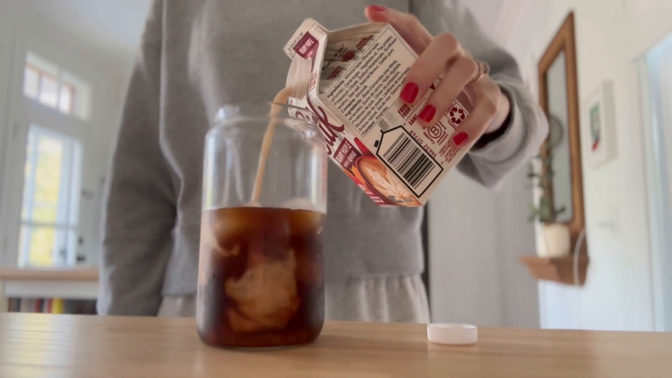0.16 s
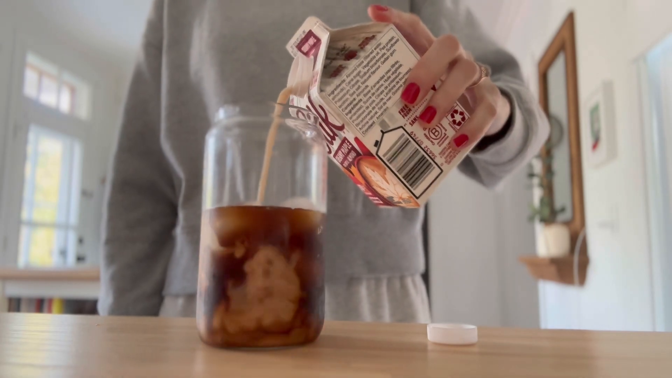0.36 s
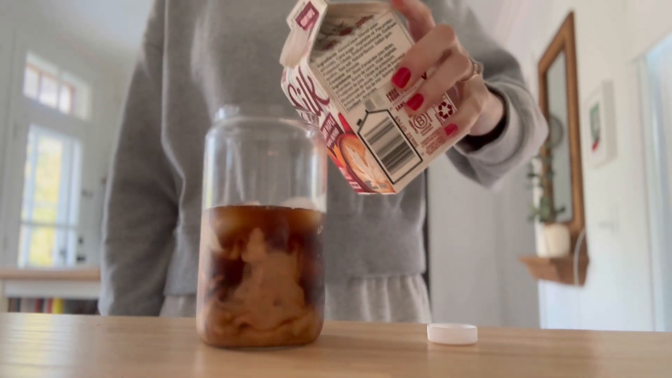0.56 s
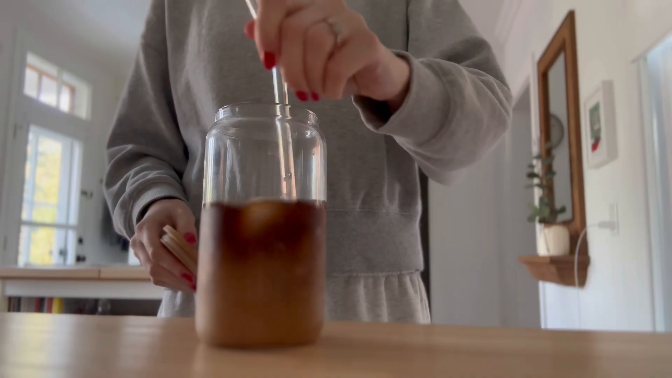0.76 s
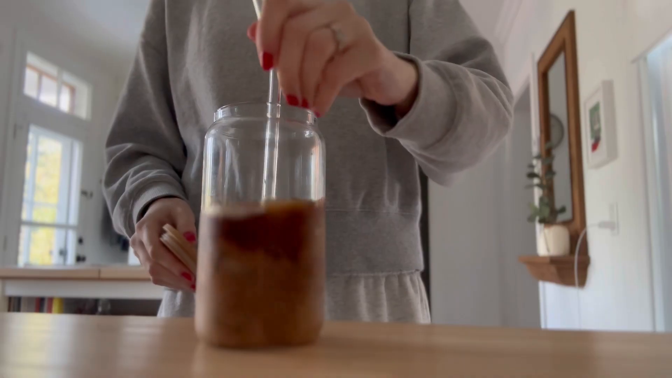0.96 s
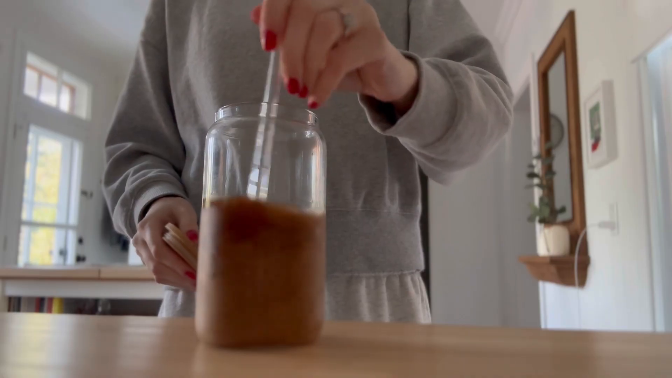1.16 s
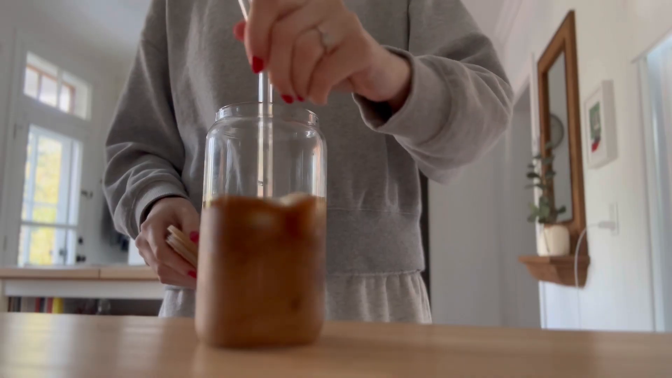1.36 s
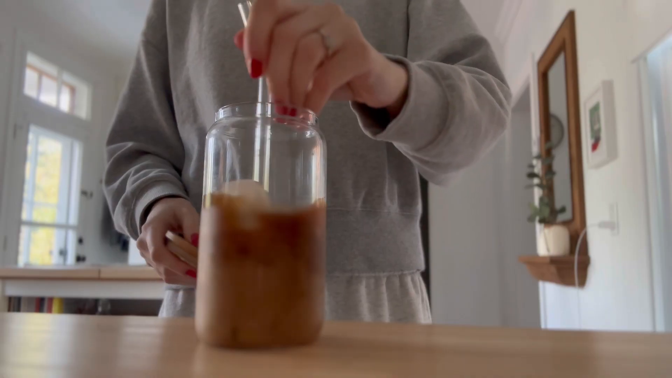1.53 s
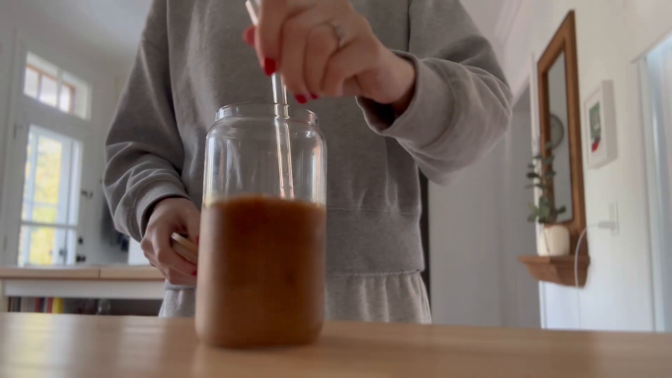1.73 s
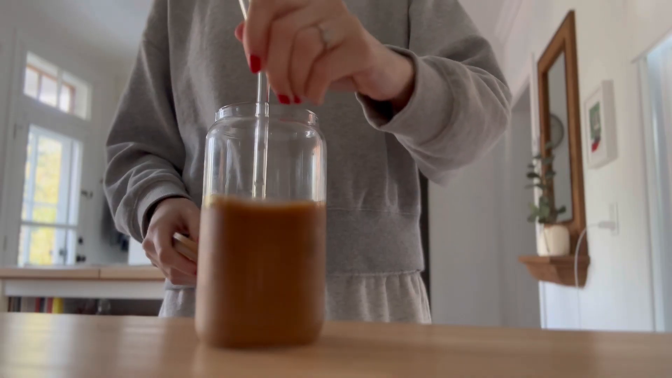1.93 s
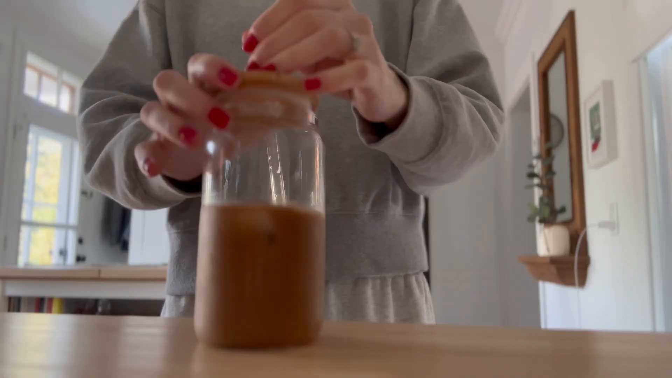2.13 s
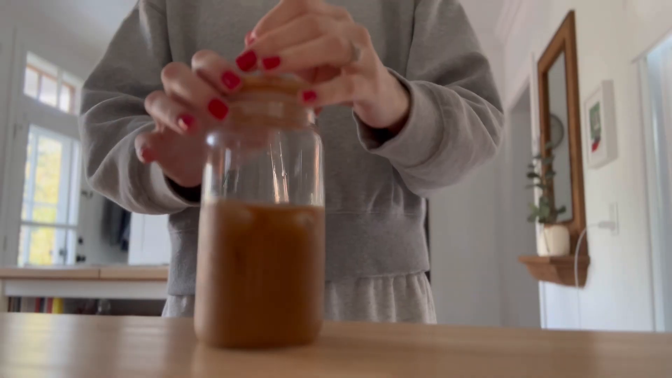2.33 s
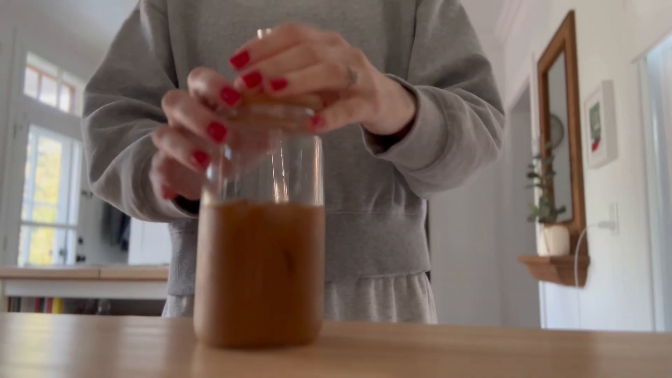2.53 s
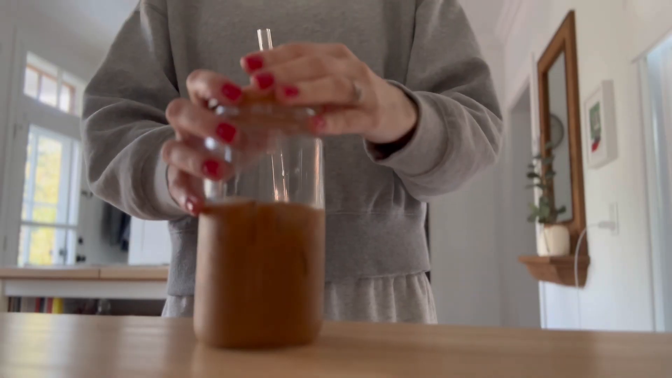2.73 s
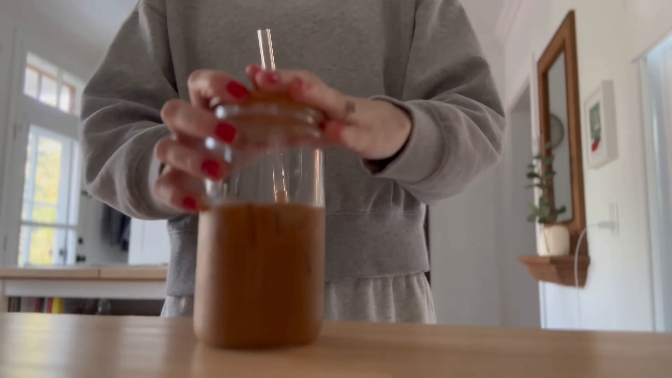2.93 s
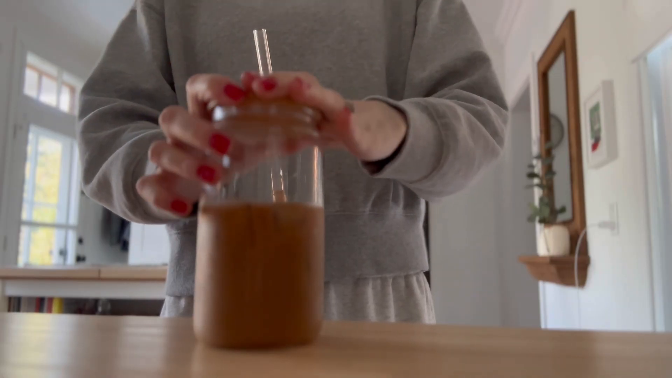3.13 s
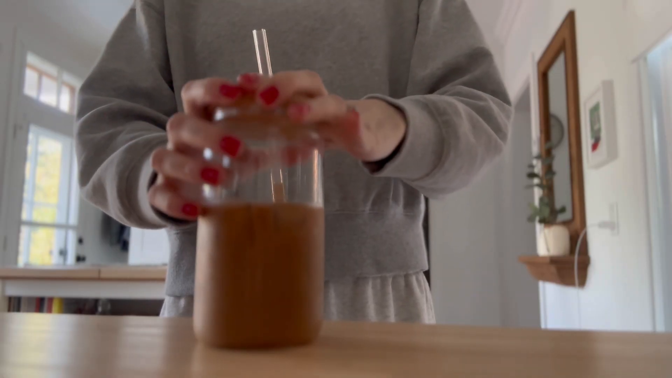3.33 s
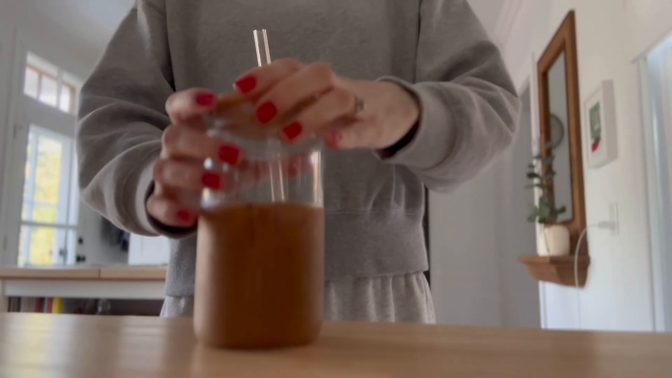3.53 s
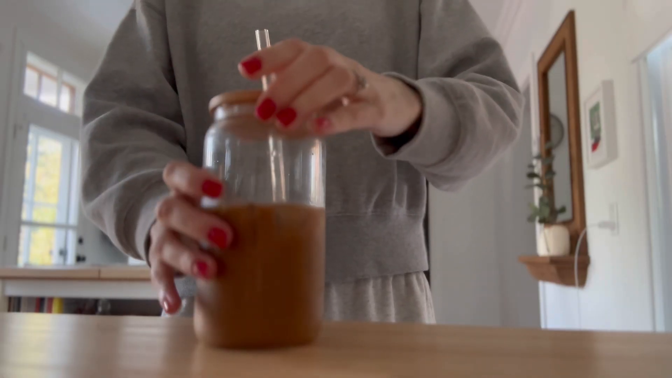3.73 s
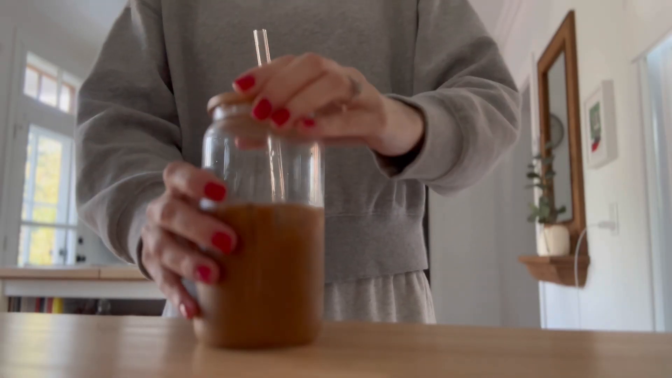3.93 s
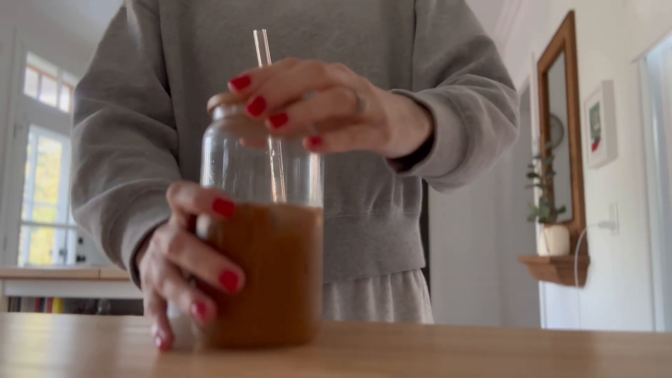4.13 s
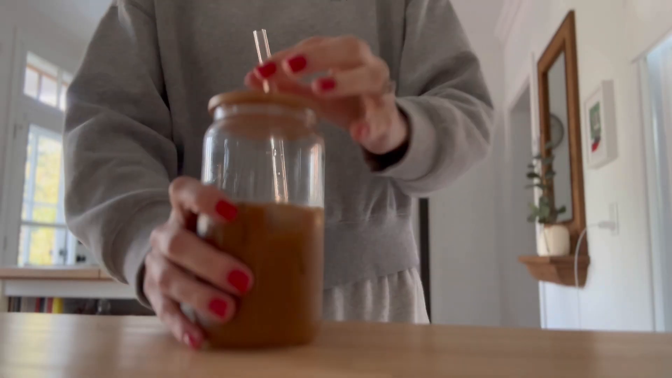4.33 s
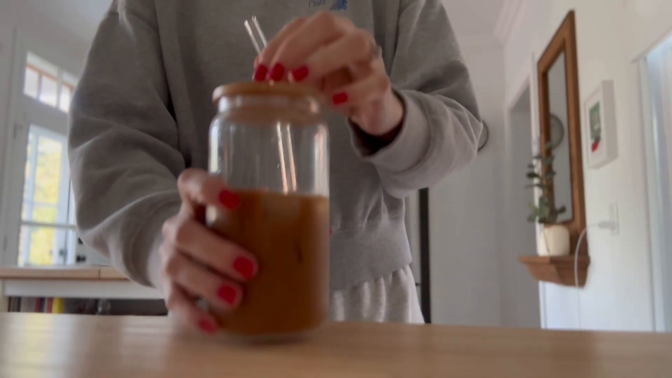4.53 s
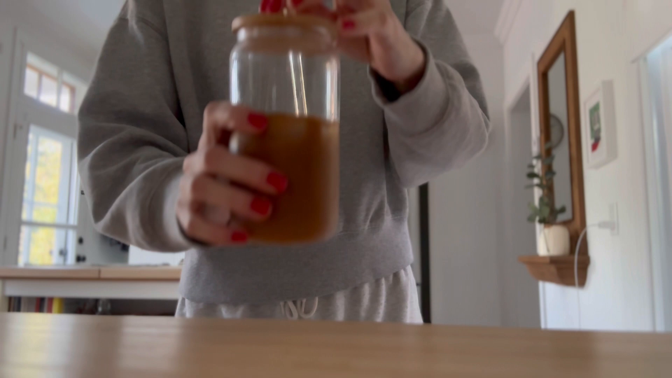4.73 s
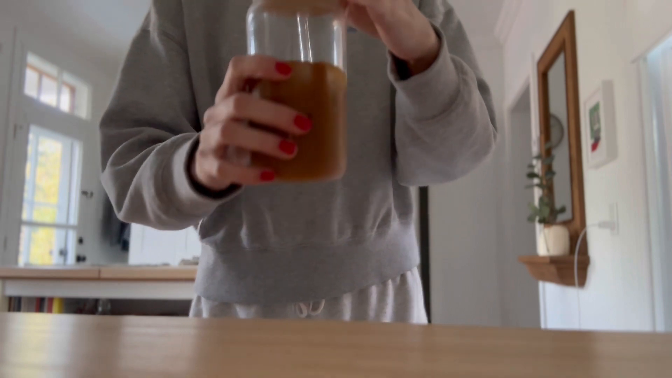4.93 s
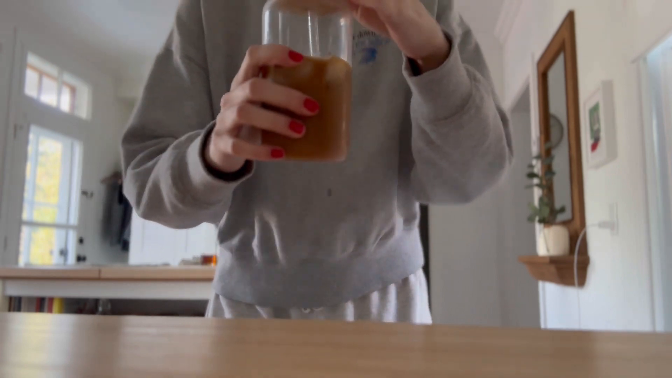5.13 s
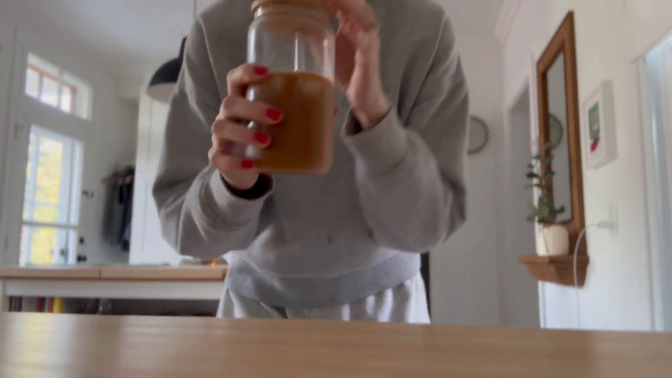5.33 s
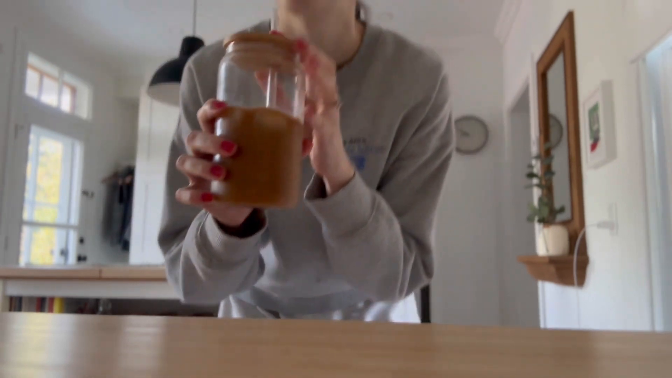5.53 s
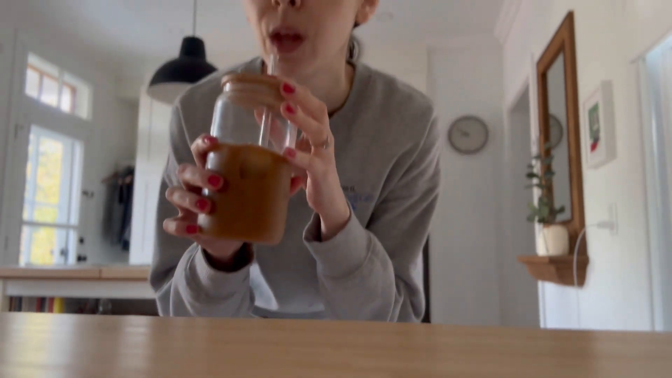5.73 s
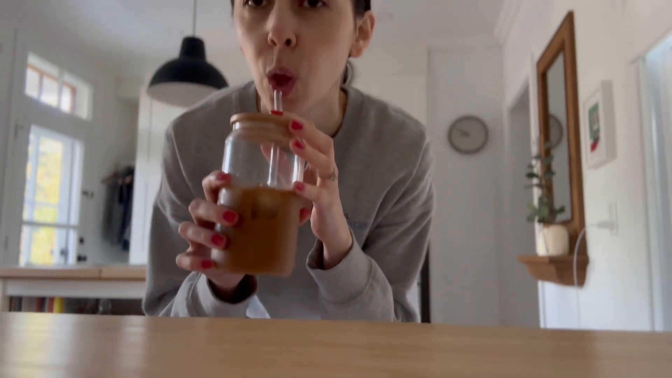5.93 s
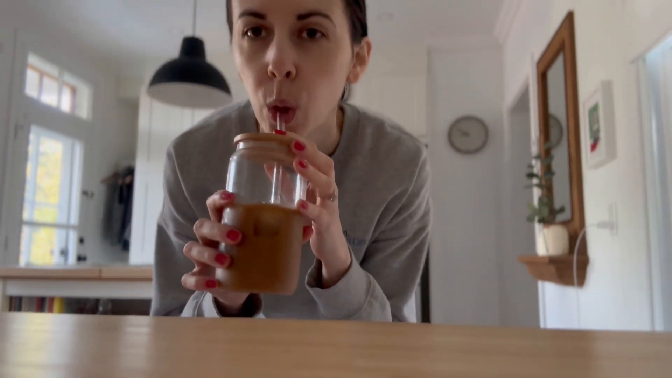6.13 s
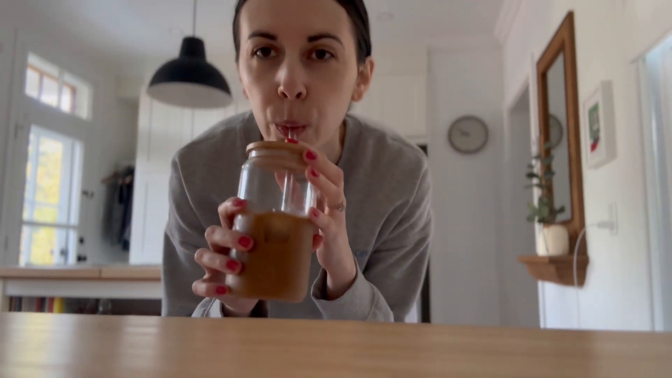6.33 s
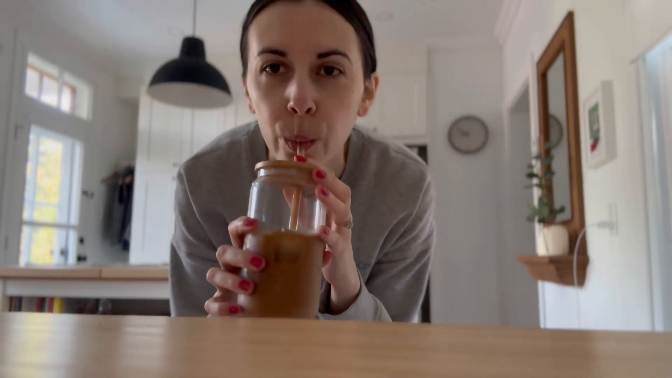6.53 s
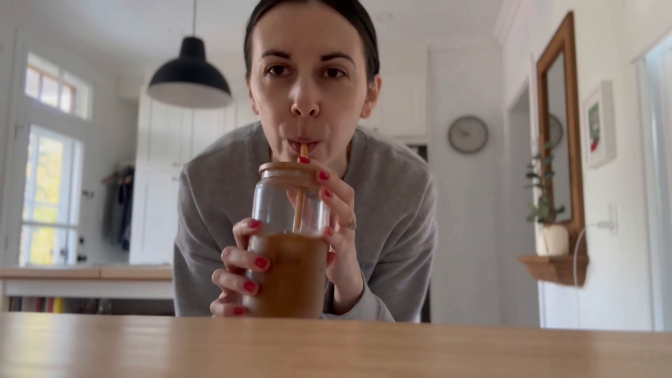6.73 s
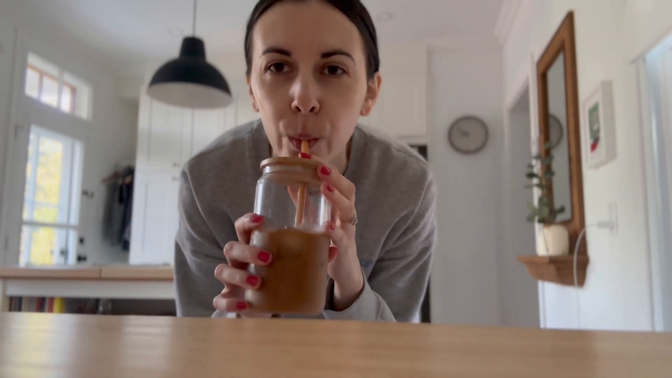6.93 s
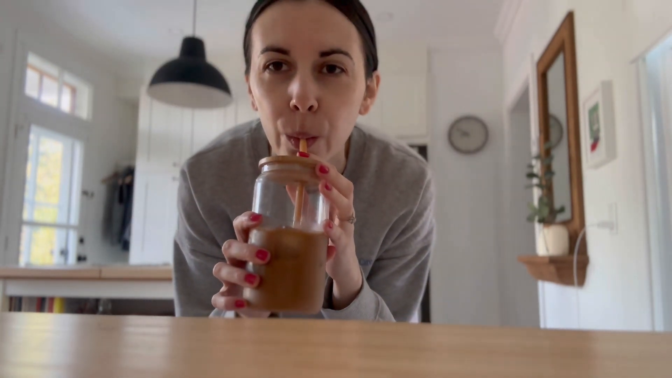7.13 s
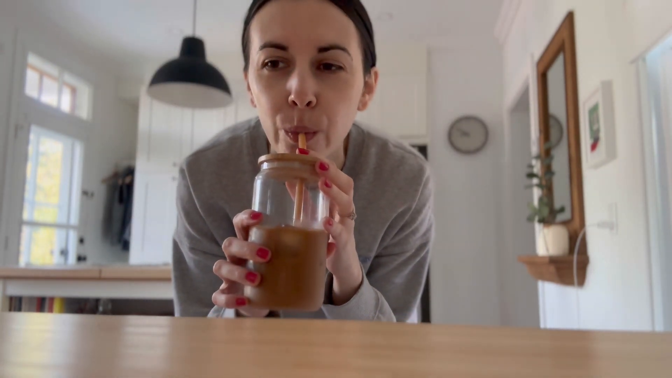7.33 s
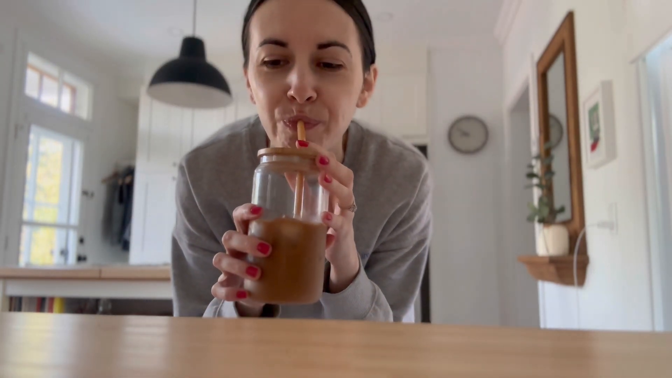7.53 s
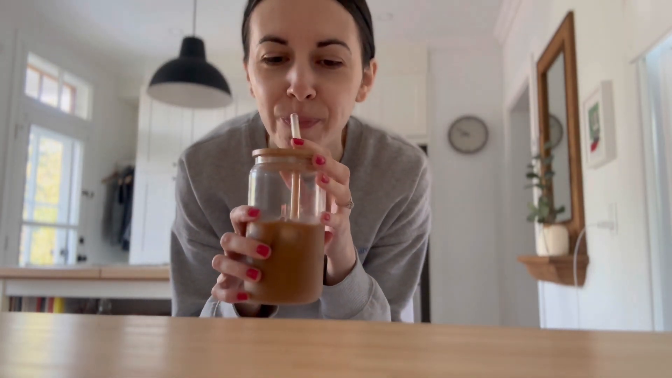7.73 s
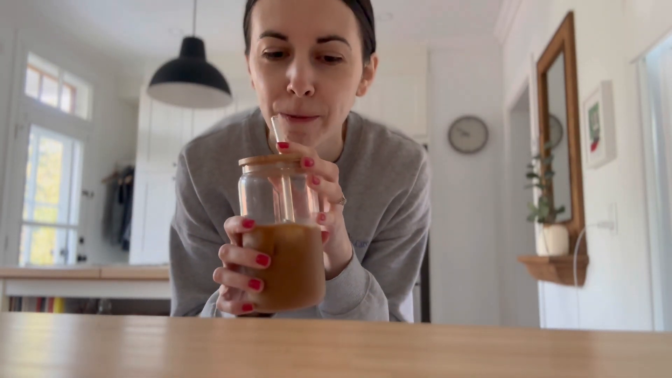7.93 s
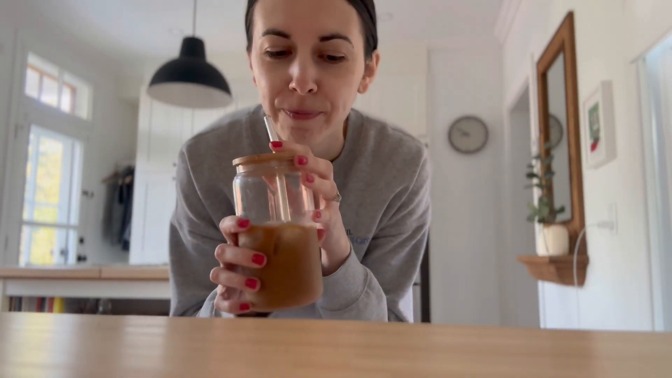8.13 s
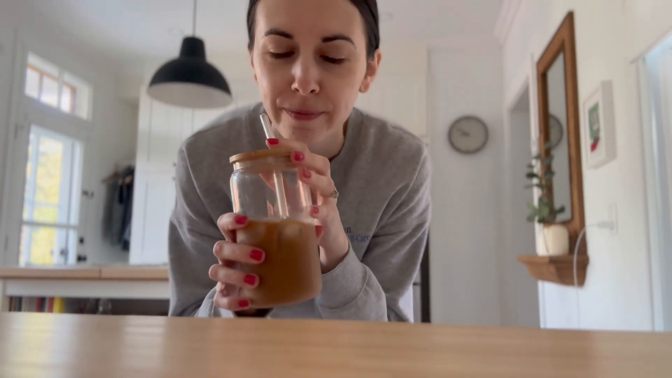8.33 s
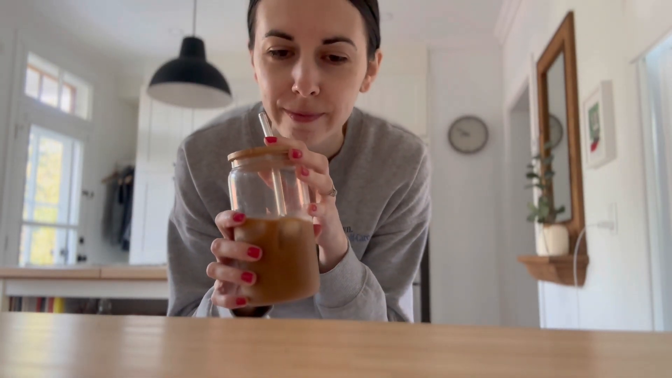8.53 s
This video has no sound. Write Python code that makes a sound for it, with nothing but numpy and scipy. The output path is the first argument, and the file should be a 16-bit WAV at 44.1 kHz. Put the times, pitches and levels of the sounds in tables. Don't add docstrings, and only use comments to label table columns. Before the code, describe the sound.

A quiet kitchen heard from close stereo microphones on a wooden counter, with faint hiss and a low, wavering rumble of a tumbling machine in a far room. From 0 to 0.7 s there is little besides that bed, light cloth rustle and a soft bump near 0.55. At 0.75 s stirring starts abruptly: ice cubes clatter densely against a glass jar, with bright straw clicks, hollow cube knocks, short ringing glass tones and gritty grinding, and a sharp rim tap at 1.6. It thins after 1.9, with a strong clink at 2.15. A lid knocks on around 2.3 to 2.4 s; low soft thuds follow at 2.6, 3.05 and 3.8. From 4 s the jar is lifted: sleeves rustle, strongest from 5.1 to 5.9, with small damped ice clinks and a clearer one at 5.17. After 6 s it is nearly still, with sparse faint ticks, one small clink at 7.4 and light handling until 8.5.

```python
import sys
import numpy as np
from scipy import signal
from scipy.io import wavfile
from scipy.ndimage import uniform_filter1d

SR = 44100
rng = np.random.default_rng(int(sys.argv[2]) if len(sys.argv) > 2 else 0)


def to_linear_factor(level_db):
    exponent = np.asarray(level_db, float) / 20
    return 10 ** exponent


def pcm_store(signal):
    levels = np.round(np.clip(np.atleast_2d(signal), -1, 1) * 32767)
    wavfile.write(sys.argv[1], SR, levels.astype(np.int16).T)


N = 377937

# time in
# seconds, level in dB.
LOAD = [(0.0, -51), (0.55, -56), (0.79, -56), (1.1, -51), (1.26, -45.5), (1.43, -46), (1.77, -47.5),
        (2.43, -48), (2.6, -52.5), (3.55, -53), (4.68, -55.5), (5.37, -56.5), (5.92, -59), (6.2, -54.5),
        (7.83, -58), (7.97, -56), (8.4, -59), (8.57, -50.5)]
# frequency in Hz, level in dB per Hz.
TUMBLE_SPECTRUM = [(35, -36), (60, -2.5), (150, -3.5), (357, -5), (441, -12), (487, -7.5), (650, -19),
                   (840, -50), (1430, -120)]
# frequency in Hz, level in dB per Hz.
HOLLOW_SPECTRUM = [(350, -36), (600, -1.5), (895, 11.5), (1650, -25), (1900, -17), (2470, -44),
                   (4180, -120)]
# frequency in Hz, level in dB rms.
MOTOR = [(37, -61), (74, -65), (147.5, -59.5)]
# frequency in Hz, level in dB per Hz.
HISS_SPECTRUM = [(590, -27), (1000, -6.5), (1320, -11), (1620, -17), (3500, -21), (7000, -29), (9000, -23),
                 (13800, -36)]
# frequency in Hz, left-right likeness from -1 to 1.
LIKENESS = [(60, 0.94), (180, 0.7), (550, -0.27), (1650, 0.36), (4970, -0.39), (15000, 0.18)]
# frequency in Hz, echo level in dB, t60 in seconds.
KITCHEN = [(700, -13.5, 0.29), (2850, -24.5, 0.51), (10200, -14, 0.37)]
# frequency in Hz, level in dB per Hz.
RUSTLE_SPECTRUM = [(710, -41), (1200, -7.5), (2410, -9), (9990, -28), (13200, -37.5), (15500, -51)]
# start in seconds, rise in seconds, fall of 20 dB in seconds (held within
# 0.05 to 0.45), level in dB.
SLEEVE_MOVES = [(0, 0.0043, -0.24, -74), (0.129, 0.008, 0.46, -75.5), (.562, 0.017, 0.12, -66.5),
                (2.6, 0.019, 1.5, -75.5), (2.76, 0.046, .45, -78), (3.05, 0.072, 0.2, -80),
                (3.33, 0.084, 0.5, -80), (3.999, 0.038, 1.4, -75), (4.437, 0.021, 40.5, -75.5),
                (4.581, 0.13, -0.3, -69.5), (4.82, 0.12, 3, -75), (5.16, 0.15, 0.69, -68),
                (5.3, 0.064, 3.2, -69), (5.559, 0.02, 0.4, -67), (5.853, 0.074, 0.1, -65.5),
                (5.93, 0.075, -0.06, -73.5), (6.19, 0.05, 1.7, -74), (6.5, 0.04, -11, -75),
                (7.0, 0.21, -6, -80), (7.788, 0.057, 0.8, -75), (7.9, 0.13, -6.5, -80.5),
                (8.3, 0.058, -12.5, -87.5), (8.399, 0.026, 1, -71.5)]
# start in seconds, peak in dB, pitch in Hz, t60 in seconds.
THUDS = [(0.281, -34.5, 238, 0.048), (0.565, -33, 135, 0.0087), (0.911, -22, 402, 0.023),
         (0.982, -20, 278, 0.017), (1.039, -28, 690, 0.021), (1.317, -34, 418, 0.072),
         (1.61, -33, 395, 0.14), (2.139, -39, 197.3, 0.3), (2.291, -22.5, 513, 0.04),
         (2.465, -48, 610, 0.11), (2.607, -34.5, 407, 0.039), (3.038, -28, 282.6, 0.037),
         (3.07, -29, 124, 0.052), (3.778, -25.5, 292, 0.041), (3.81, -33, 120, 0.048),
         (2.368, -30, 116, 0.12), (2.383, -27.5, 620, 0.035), (2.408, -13, 574, 0.053),
         (2.579, -30, 84.5, 0.048), (3.044, -17, 105.6, 0.035), (3.786, -17, 110, 0.04),
         (4.258, -33, 82.2, 0.14), (4.373, -30.5, 86.7, 0.23), (6.153, -41, 222.5, 0.044),
         (7.156, -44.5, 485, 0.17), (7.855, -45.5, 832, 0.099), (7.795, -49, 832, 0.044),
         (3.387, -36, 110.6, 0.1), (3.599, -35, 119, 0.11), (4.05, -42, 475, 0.069),
         (8.326, -50.5, 750, 0.031), (8.365, -45, 804, 0.033), (8.432, -44, 425, 0.02)]
# start in seconds, peak in dB, tilt in dB per octave.
RIM_TAPS = [
    (1.2005, -24, 11),
    (1.614, -11.5, 4),
    (2.2647, -52, -5),
    (2.288, -22, 0),
    (2.4988, -34.5, 1),
    (5.1659, -36, 13),
    (5.4736, -49.5, -4.5),
]
# frequency in Hz, level in dB, t60 in seconds.
STRAW_MODES = [(6760, -8.5, 0.083), (7510, -3.5, 0.12), (7740, -2, 0.13), (8270, -4.5, 0.051),
               (9350, -15.5, .15), (9600, -4.5, 0.053), (11190, -16, 0.06), (12430, -4, 0.067),
               (13400, -15, .15)]
# start in
# seconds, level in dB, top octave over it in dB.
TICKS = [(0.7574, -23.5, -5.5), (0.8344, -26.5, -13.5), (0.8542, -31, -11.5), (0.866, -33.5, -8),
         (0.899, -33, -5.5), (0.91, -23, -5), (0.942, -29, -6.5), (0.978, -21, -6.5), (1.01, -24.5, -6),
         (1.0372, -21, -10), (1.0635, -31.5, -6.5), (1.07, -32, -11), (1.1343, -35.5, -8.5),
         (1.2016, -21, -7), (1.222, -17, -10), (1.2723, -23.5, -11), (1.296, -27, -6), (1.304, -19, -11.5),
         (1.328, -26.5, -5.5), (1.38, -25, -5), (1.4194, -35, -11.5), (1.4665, -39, -9.5),
         (1.488, -34.5, -10), (1.508, -36.5, -12.5), (1.541, -29.5, -12), (1.5472, -20, -8),
         (1.572, -30, -15.5), (1.588, -26.5, -8), (1.615, -12.5, -1), (1.699, -19, -12.5),
         (1.744, -32.5, -15), (1.764, -27, -10), (1.8033, -36, -12), (1.809, -35.5, -11.5),
         (1.8318, -31.5, -10.5), (1.846, -35.5, 0.5), (1.8648, -37, -5.5), (1.876, -33.5, -15),
         (1.9, -37.5, -4.5), (1.9081, -32.5, -6), (1.932, -23, -6), (2.043, -40.5, -17),
         (2.076, -49, -10.5), (2.114, -36, -13.5), (2.1431, -34, -16.5), (2.2652, -48, -10),
         (2.2744, -46, -13), (2.2884, -17.5, -8), (2.5017, -38.5, -5.5), (2.562, -45.5, -8),
         (2.606, -36.5, -18), (2.6904, -62, -14),
         (3.034, -54, -3), (4.833, -52, -23), (4.909, -45, -12), (4.918, -43, -10), (5.1467, -58, -14),
              (5.1673, -31.5, -8), (5.474, -54, -6)]
# low edge in Hz, high edge in Hz, level in dB, fade in seconds.
TICK_CRACK = [
    (4018, 9240, -1.5, 0.0034),
    (9600, 15800, -6, 0.0035),
]
# time in seconds, level in dB.
GRIND = [(0.755, -44), (0.79, -36.5), (0.86, -33), (0.96, -38), (1.304, -39.5), (1.69, -40), (1.802, -42.5),
         (2.3, -65.5)]
# frequency in Hz, level in dB, t60 in seconds.
STANDING_MODES = [
    [(2411, -9.5, 0.013), (2934, -7, 0.02), (2864, -4.5, 0.1), (3440, -10.5, 0.17), (4480, -12.5, 0.076)],
    [(391, -16, 0.093), (1020, -9.5, 0.045), (1147, -2.5, 0.085)],
    [(1654, 1.5, 0.26), (1630, -10.5, 0.08)],
]
# frequency in Hz, level in dB, t60 in seconds.
LIFTED_MODES = [
    [(2484, -12, 0.27), (2960, 4, 0.022), (3506, 0.5, 0.047), (4630, -8.5, 0.074), (5090, -4, 0.023)],
    [(1120, 2, 0.031)],
    [(1656, -5.5, 0.092), (1706, 2, 0.045), (1850, -6, 0.021)],
]
# low edge in Hz, high edge in Hz, level in dB, fade in seconds.
CUBE_CRACK = [
    (1750, 5400, -10.5, 0.0055),
    (485, 1810, -10.5, 0.0029),
    (1290, 3830, -10.5, 0.0036),
    (5800, 10800, -3.5, 0.0024),
]
# start in seconds, wall tone in dB, overtones in dB, ring length factor.
SQUARE_HITS = [(0.7551, -22, -36, 0.63), (0.837, -23, -26.5, 0.64), (0.866, -21, -50, 1),
               (0.9008, -26.5, -30, 0.56), (.926, -22, -50.5, .6), (0.976, -23.5, -50.5, .6),
               (1.02, -23.5, -51, .6), (0.9444, -9.5, -24.5, 0.18), (1.01, -24.5, -26.5, 0.59),
               (1.0364, -12.5, -27.5, 0.81), (1.063, -14, -24.5, 0.48), (1.077, -11.5, -35, 0.57),
               (1.134, -28, -38, 0.17), (1.1825, -32, -40, 0.17), (1.2272, -25.5, -24, 0.64),
               (1.297, -19.5, -26.5, 0.38), (1.3056, -17, -22.5, 0.77), (1.3256, -23.5, -25.5, 0.41),
               (1.4692, -24, -30.5, 0.29), (1.49, -20.5, -28.5, 0.78), (1.5094, -25, -30, 0.68),
               (1.537, -14.5, -26, 0.35), (1.544, -14.5, -18, 0.37), (1.5499, -16, -29, 0.21),
               (1.589, -25.5, -27.5, 0.88), (1.6112, -17, -24, 1), (1.6304, -19, -26.5, 0.6),
               (1.745, -20.5, -27.5, 0.98), (1.796, -21.5, -30, 0.34), (1.8037, -14.5, -25.5, 0.4),
               (1.8748, -35, -33, 0.25), (1.932, -9, -28, 1), (1.998, -25, -38.5, 0.36),
               (2.044, -27.5, -34, 0.44), (2.032, -29.5, -45, 0.6), (2.1436, -23.5, -48, .8),
               (1.698, -24, -50, .7), (2.249, -47, -60, 0.3), (2.268, -29.5, -50, 0.73),
               (2.4091, -22, -48, 0.28), (2.69, -42.5, -65, .25), (2.563, -33, -52, 0.2),
               (1.096, -23.5, -52, 0.7), (2.073, -35.5, -35.5, 0.38)]
# start in seconds, overtones in dB, favoured pitch in Hz.
GLANCING_HITS = [(0.7667, -25.5, 2970), (0.853, -20.5, 2760), (0.8659, -27, 2850), (0.9093, -21, 2240),
                 (0.9274, -21.5, 2870), (0.9772, -21.5, 2370), (1.0087, -23.5, 2280), (1.07, -23.5, 4600),
                 (1.0635, -16.5, 2774), (1.2017, -30.5, 4850), (1.2131, -25, 2710), (1.2545, -21, 2848),
                 (1.2714, -29, 2730), (1.3808, -28.5, 2368), (1.4197, -24, 2376), (1.5733, -19, 2810),
                 (1.6172, -19.5, 2848), (1.6474, -20, 2810), (1.6644, -19, 3380), (1.7, -14.5, 2850),
                 (1.7644, -15, 2760), (1.8028, -16.5, 2880), (1.8314, -25.5, 2800), (1.8444, -31, 2864),
                 (1.8654, -37, 2797), (1.8761, -30, 3450), (1.8954, -33, 2910), (1.9074, -27, 2725),
                 (1.9244, -13.5, 2960), (1.9514, -32, 2850), (1.9779, -29, 2790), (2.0033, -28, 2900),
                 (2.1141, -30.5, 2940), (2.1435, -9.5, 2745), (2.2687, -31, 3430), (2.2887, -15.5, 2700),
                 (2.4987, -18, 2870), (2.605, -17.5, 4340), (2.6903, -35.5, 3630)]
# start in seconds, wall tone in dB, overtones in dB, favoured pitch in Hz.
HELD_HITS = [(4.0748, -47, -57.5, 2870), (4.3416, -47.5, -51, 3380), (4.478, -42, -48.5, 3010),
             (4.4967, -38, -50.5, 3100), (4.637, -57, -55, 2790), (4.689, -48, -50.5, 2860),
             (4.715, -48, -49.5, 2850), (4.8347, -35.5, -33.5, 2790), (4.837, -57, -61, 2484),
             (4.836, -60, -52, 4800), (4.883, -36.5, -46, 2730), (4.917, -44.5, -39, 2790),
             (4.954, -45, -53, 2900), (5.645, -57, -48, 2900), (4.9664, -35, -48, 2700),
             (5.068, -36.5, -48, 3360), (5.1702, -61, -37.5, 3150), (5.252, -39.5, -49, 2740),
             (5.2965, -37, -44, 2420), (5.476, -56, -45.5, 2990), (5.6357, -44, -44.5, 3460),
             (5.6858, -39, -51.5, 2510), (5.8088, -60, -54, 3460), (6.4056, -48.5, -67, 3520),
             (6.595, -49, -61.5, 3570), (6.789, -56, -64, 2484), (7.2158, -55.5, -65, 3610),
             (7.42, -31, -37, 2523), (7.4221, -50, -40, 4720), (7.4648, -37, -49, 2430),
             (7.623, -54, -58.5, 2470), (8.1425, -56, -56.5, 2950), (8.377, -80, -65, 2950),
             (8.486, -52, -53, 2880), (8.514, -49.5, -69, 2910), (4.672, -45, -53.5, 3000),
             (4.9066, -35, -48, 2900), (5.002, -49, -60, 2930), (5.1476, -47, -49.5, 2750),
             (5.2734, -40, -55, 2500), (5.5678, -50, -66, 3420), (5.7752, -52, -62, 2830),
             (6.305, -54, -72, 3470), (7.412, -58, -53, 3600), (7.639, -62, -58, 2490),
             (7.673, -57, -76, 3470), (7.7313, -60, -81, 2950), (8.0711, -55, -84, 2960),
             (8.1735, -61.5, -69, 2930), (7.29, -80, -69.5, 3520)]
# start in seconds, level in dB.
KNOCKS = [(0.7657, -27.5), (0.91, -17.5), (0.9744, -22.5), (1.009, -8.5), (1.039, -11), (1.0761, -25.5),
          (1.1181, -20), (1.2283, -22.5), (1.258, -33), (1.3055, -25.5), (1.3283, -14), (1.383, -20),
          (1.4174, -17.5), (1.4649, -25), (1.5467, -24.5), (1.553, -16), (1.628, -24), (1.902, -41),
          (1.923, -23), (2.1156, -44), (2.1446, -32.5), (2.2937, -28), (2.4102, -18.5), (2.501, -33),
          (4.833, -54), (5.1685, -24), (5.259, -41), (5.297, -56), (5.474, -32.5), (5.5845, -62)]
RESTS = [.782, .91, 0.956, 1.0, 1.113, 1.146, 1.36, 1.72, 2.012, 2.087, 2.19, 2.33, 2.43, 2.52, 2.575, 2.62]

GRIP_S, LIFT_S, FAR_S = 2.1, 3.9, 6.0
ICE_LOW_HZ, ICE_HIGH_HZ = 1880, 6370
WALL_STEADY = 0.27


def rms_one(x):
    return x / np.sqrt(np.mean(x ** 2) + 1e-20)


def in_time(rows):
    s, db = np.transpose(rows)
    left = db[0] if s[0] < .05 else -120
    right = db[-1] if s[-1] > 8 else -120
    return np.interp(np.arange(N) / SR, s, db, left=left, right=right)


def at_hz(points, hz):
    point_hz, value = np.transpose(points)
    return np.interp(np.log(hz), np.log(point_hz), value)


def band(x, low, high):
    return signal.sosfilt(signal.butter(2, [low, high], "band", fs=SR, output="sos"), x)


def drift(rate_hz):
    r = np.exp(-80 * np.pi * rate_hz / SR)
    slow = signal.lfilter([1], [1, -2 * r, r * r], rng.standard_normal(N // 40 + 2002))[2000:]
    return np.interp(np.arange(N) / 40, np.arange(len(slow)), rms_one(slow))


def ring(clicks, hz, t60):
    r, w = to_linear_factor(-60 / (t60 * SR)), 2 * np.pi * hz / SR
    return signal.lfilter([0, np.sin(w)], [1, -2 * r * np.cos(w), r * r], clicks + 1e-18)


def add(out, s, sound):
    at = round(s * SR)
    out[:, at:at + sound.shape[1]] += sound[:, :N - at]


def banded_noise(spectrum, patchy_db):
    edges = np.geomspace(spectrum[0][0], spectrum[-1][0], 10)
    out, white = 0, rng.standard_normal((2, 2, N))
    for k, (low, high) in enumerate(zip(edges, edges[1:])):
        mid, side = band(white[k % 2], low, high)
        hz = np.sqrt(low * high)
        alike = np.clip(at_hz(LIKENESS, hz), -1, 1)
        gain = to_linear_factor(at_hz(spectrum, hz) + patchy_db * drift(15))
        out = out + gain * (np.sqrt(1 + alike) * mid + np.sqrt(1 - alike) * side * [[1], [-1]])
    return rms_one(out)


def microphone_hiss():
    low_pass = signal.butter(8, 14000, fs=SR, output="sos")
    hiss = to_linear_factor(-74.5) * signal.sosfilt(low_pass, banded_noise(HISS_SPECTRUM, patchy_db=3.5))
    return hiss + to_linear_factor(-99.0) * rms_one(band(rng.standard_normal((2, N)), 8800, 9150))


def far_machine(near_low, near_hollow):
    t, load_db = np.arange(N) / SR, in_time(LOAD)
    hum = 0
    for hz, db in MOTOR:
        hum = hum + np.sqrt(2) * to_linear_factor(db + 0.65 * drift(2.2)) * np.sin(2 * np.pi * hz * t)
    load = np.hypot(to_linear_factor(load_db + 3.0), near_low) * banded_noise(TUMBLE_SPECTRUM, patchy_db=3)
    hollow = to_linear_factor(-65.5 + 1.9 * (load_db - np.median(load_db)))
    return hum + load + np.hypot(hollow, near_hollow) * banded_noise(HOLLOW_SPECTRUM, patchy_db=4)


def kitchen(x):
    t, tail = np.arange(SR // 2) / SR, 0
    for hz, echo_db, t60 in KITCHEN:
        noise = rms_one(band(rng.standard_normal((2, len(t))), hz / 4.8, hz * 1.73))
        tail = tail + to_linear_factor(echo_db - 31.0) * noise * to_linear_factor(-60 * t / t60) * (t > .004)
    return signal.fftconvolve(x, tail, axes=1)[:, :N]


def sleeves():
    t, power = np.arange(0, N + 64, 64) / SR, 0
    for s, rise_s, fall_s, db in SLEEVE_MOVES:
        rise = np.clip((t - s) / max(rise_s, .005), 0, 1)
        fall_db = 20 * np.maximum(t - s - rise_s, 0) / np.clip(fall_s, .05, .45)
        power = power + (rise * to_linear_factor(db - fall_db)) ** 2
    return np.interp(np.arange(N) / SR, t, np.sqrt(power))


def thuds():
    out = np.zeros(N)
    for s, peak_db, hz, t60 in THUDS:
        push = np.zeros(SR // 3)
        contact = np.hanning(3 + int(SR * 0.45 / hz))
        push[:len(contact)] = to_linear_factor(peak_db + 3) * contact / contact.sum()
        blow = ring(push, hz, max(t60, .01)) + 0.05 * ring(push, 1.95 * hz, 0.015)
        blow += 0.35 * min(1, 750.0 / hz) * ring(push, 105.13, 0.12)
        blow += 0.27 * ring(push, 390, 0.066)
        at = round(s * SR)
        out[at:at + len(blow)] += blow[:N - at]
    out = band(band(out, 90, 1600), 90, 1600)
    at = np.arange(N)
    late = np.interp(at - 0.00019 * SR, at, out)
    return np.array([to_linear_factor(-2.2) * late, to_linear_factor(0.56) * out])


def struck(hz, level_db, t60, luck, spread_db, detune, beam, flutter_db, choke_s=1, choked=0):
    pitch_luck, strength_luck, phase_luck, sway_luck = luck
    t = np.arange(int(SR * min(.2, np.max(t60))))[:, None] / SR
    w = 2 * np.pi * hz * (1 + detune * pitch_luck)
    knots, place = rng.standard_normal((100, len(hz))), t[:, 0] / 0.0081
    whole = place.astype(int)
    waver = knots[whole] + (place - whole)[:, None] * (knots[whole + 1] - knots[whole])
    waver = waver * np.minimum(1, t * 100)
    choke_db = -16 * choked * np.clip((t - choke_s) / .008, 0, 1)
    fade = to_linear_factor(level_db + spread_db * strength_luck + flutter_db * waver - 60 * t / t60 + choke_db)
    fade = fade * np.minimum(1, (t[-1] - t) * 50)
    fade = fade * (1 - np.exp(-t / 0.0014))
    wide = np.minimum(hz / 2400.0, 1)
    sway = to_linear_factor(2.5 * wide * sway_luck)
    left = np.sin(w * t) * sway
    right = np.sin(w * t + beam * wide * phase_luck - 1e-4 * w) / sway
    return np.array([(fade * left).sum(axis=1), (fade * right).sum(axis=1)])


def cracks(rows, puffs):
    out, white = 0, rng.standard_normal((2, N))
    white[1] = 1.6 * np.roll(white[0], 3) + 1.1 * white[1]
    for f, (low_hz, high_hz, crack_db, fade_s) in enumerate(puffs):
        starts = np.full(N, 1e-18)
        np.add.at(starts, np.round(rows[:, 0] * SR).astype(int), to_linear_factor(rows[:, 1 + f] + crack_db))
        shape = 0
        for gain, s in [(1, fade_s), (to_linear_factor(-15.5), 3.7 * fade_s)]:
            shape = shape + gain * signal.lfilter([1], [1, -np.exp(-1 / (s * SR))], starts)
        shape = uniform_filter1d(shape, size=int(.0008 * SR))
        out = out + band(rms_one(band(white, low_hz, high_hz)) * shape, low_hz, high_hz)
    return out


def straw():
    out, (hz, level_db, t60) = np.zeros((2, N)), np.transpose(STRAW_MODES)
    for s, peak_db, tilt_db in RIM_TAPS:
        tap_db = peak_db + level_db - 2.5 + tilt_db * np.log2(hz / 10000.0)
        for bounce_s in (0, 0.0055):
            luck = rng.standard_normal((4, len(hz)))
            add(out, s + bounce_s, struck(hz, tap_db, 0.28 * t60, luck, spread_db=-3.5, detune=0.014,
                                          beam=0.91, flutter_db=3.5))
    return out


def ticks():
    s, db, top_db = np.transpose(TICKS)
    return cracks(np.transpose([s, db - 0.5, db + top_db - 0.5]), TICK_CRACK)


def grinding(gain, families, per_s, top_hz):
    sizes = to_linear_factor(4.48 * np.minimum(rng.exponential(1, N), 3)) * rng.choice([-1, 1], N)
    clicks = sizes * (rng.random(N) < per_s / SR) * gain
    dealt = rng.integers(0, 8, N)
    both = to_linear_factor(-10.5) * band(clicks, 1500, top_hz)
    for k, (hz, db, t60) in enumerate(np.concatenate(families)):
        both += to_linear_factor(db - 13.5) * ring(clicks * ((dealt + k) % 2), hz, 0.41 * t60)
    for k, hz in enumerate(np.geomspace(ICE_LOW_HZ, ICE_HIGH_HZ, 8)):
        both += to_linear_factor(-17) * ring(clicks * (dealt == k), hz, 0.036)
    return np.array([both, np.roll(both, 4)])


def usual_ring(s):
    return 0.64 if s < GRIP_S else 0.37 if s < LIFT_S else 0.69


def blows():
    silent = -120
    wall = [(s, db + 7, tone_db - 1, length, 0) for s, tone_db, db, length in SQUARE_HITS]
    wall += [(s, db + 7, tone_db - 1, usual_ring(s), hz) for s, tone_db, db, hz in HELD_HITS]
    wall += [(s, db - 1.5, db - 9, usual_ring(s), hz) for s, db, hz in GLANCING_HITS]
    rows = []
    for s, db, tone_db, length, hz in wall:
        bright_db = -27 if s < LIFT_S else -15.5 - 12 * (s > FAR_S)
        rows.append((s, db, db - 13, tone_db, db + bright_db, length, hz))
    rows += [(s, silent, db + 3, silent, silent, 0.82, 0) for s, db in KNOCKS]
    return [r for r in rows if r[0] < LIFT_S], [r for r in rows if r[0] > LIFT_S]


def jar(hits, families, spread_db, detune, favour_db, flutter_db):
    rows = np.array(hits)
    family = np.array([f for f, modes in enumerate(families) for mode in modes] + [0, 0, 0])
    is_wall = family == 2
    hz, level_db, t60 = np.concatenate(families + [[(1, -11, 0.048)] * 3]).T
    out = cracks(rows, CUBE_CRACK)
    for row in rows:
        s, ring_factor, favoured_hz = row[0], row[5], row[6]
        luck, cube = rng.standard_normal((4, len(hz))), rng.random(4)
        pitch = np.append(hz[:-3], ICE_LOW_HZ * (ICE_HIGH_HZ / ICE_LOW_HZ) ** cube[:3])
        length = t60 * np.clip(ring_factor * (1 + 0.3 * (2 * cube[3] - 1) * (family == 0)), .2, 3)
        if GRIP_S < s < LIFT_S:
            length[is_wall] *= 0.69
        mode_db = row[1 + family] + level_db
        if favoured_hz:
            pitch[-1] = favoured_hz
            away_db = 60 * np.abs(np.log2(pitch / favoured_hz))
            mode_db = mode_db + (8 - np.minimum(away_db, favour_db)) * (family == 0)
            luck[1:, np.abs(pitch - favoured_hz) < .04 * pitch] = 0
        luck[1::2, is_wall] *= WALL_STEADY
        steady = np.where(is_wall, WALL_STEADY, 1)
        calm = np.where(is_wall | (pitch < 2400), WALL_STEADY, 1)
        choke_s = min([rest - s for rest in RESTS if rest > s] + [1])
        on = row[1 + family] > -100
        if on.any():
            add(out, s, struck(pitch[on], mode_db[on], length[on], luck[:, on], spread_db,
                               detune * steady[on], beam=1.0, flutter_db=flutter_db * calm[on],
                               choke_s=choke_s, choked=is_wall[on]))
    return out


def scene():
    t = np.arange(N) / SR
    cloth, stirring = sleeves(), to_linear_factor(in_time(GRIND))
    back = far_machine(to_linear_factor(-16) * stirring + to_linear_factor(20.5) * cloth, to_linear_factor(-13) * stirring + to_linear_factor(16.5) * cloth)
    rustle = to_linear_factor(12.0) * cloth * banded_noise(RUSTLE_SPECTRUM, patchy_db=3.0)
    knocks = thuds()
    nudged = to_linear_factor(19) * cloth * ((t > LIFT_S) & (t < FAR_S))
    near = straw() + ticks()
    near += grinding(to_linear_factor(6.5) * stirring, STANDING_MODES, per_s=400., top_hz=9075)
    near += grinding(nudged, LIFTED_MODES, per_s=79.0, top_hz=4025)
    standing, held = blows()
    near += jar(standing, STANDING_MODES, spread_db=2.0, detune=0.0085, favour_db=5, flutter_db=3.5)
    near += jar(held, LIFTED_MODES, spread_db=2.5, detune=0.0031, favour_db=14, flutter_db=4.5)
    return near + knocks + kitchen(near + to_linear_factor(-5.5) * knocks) + back + rustle + microphone_hiss()


def band_limit(x):
    return signal.sosfilt(signal.butter(12, 16000, fs=SR, output="sos"), x)


def record(dry):
    top = signal.sosfilt(signal.cheby2(14, 45, 16100, fs=SR, output="sos"), dry)
    top = signal.sosfilt(signal.butter(5, 13800, fs=SR, output="sos"), top)
    return band_limit(top)


dry = scene()
out = record(dry)
pcm_store(out)
```